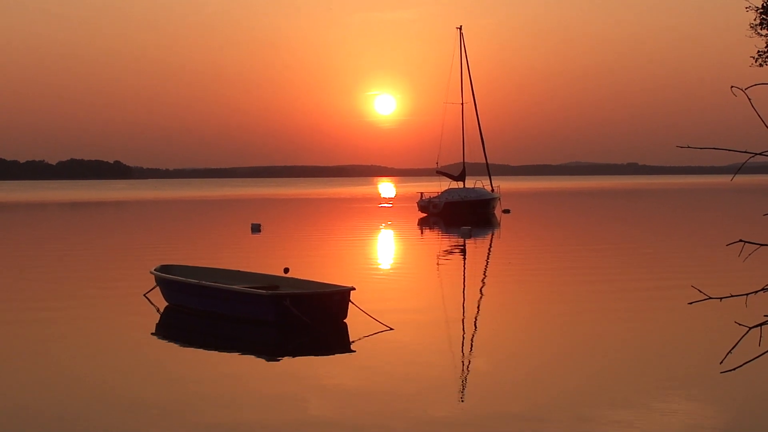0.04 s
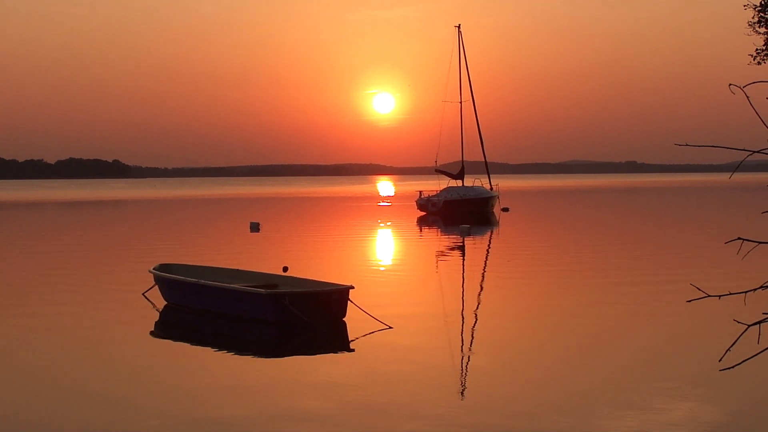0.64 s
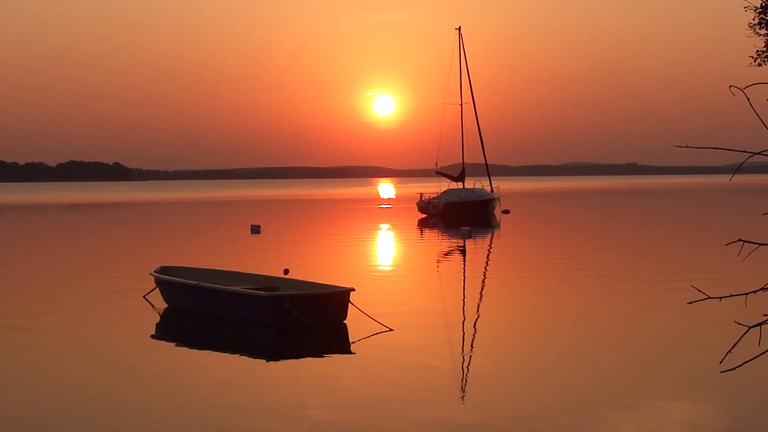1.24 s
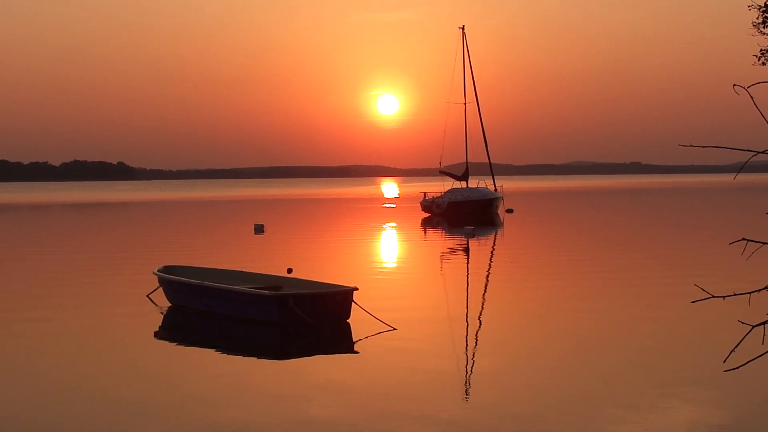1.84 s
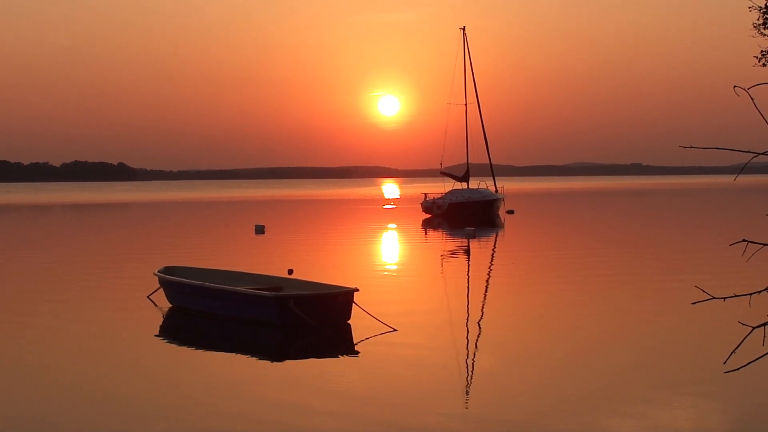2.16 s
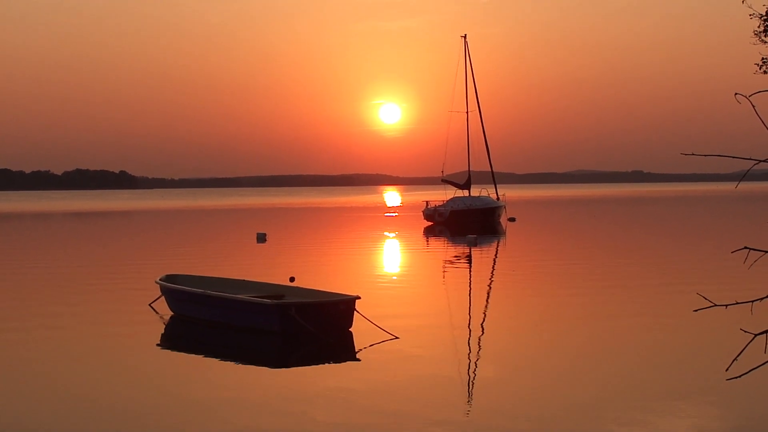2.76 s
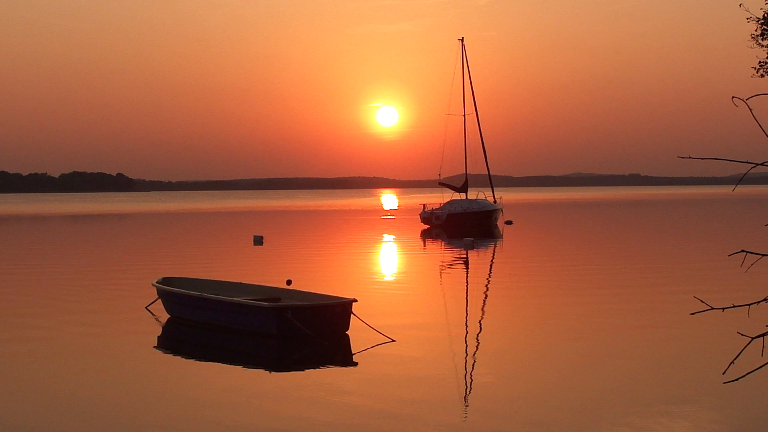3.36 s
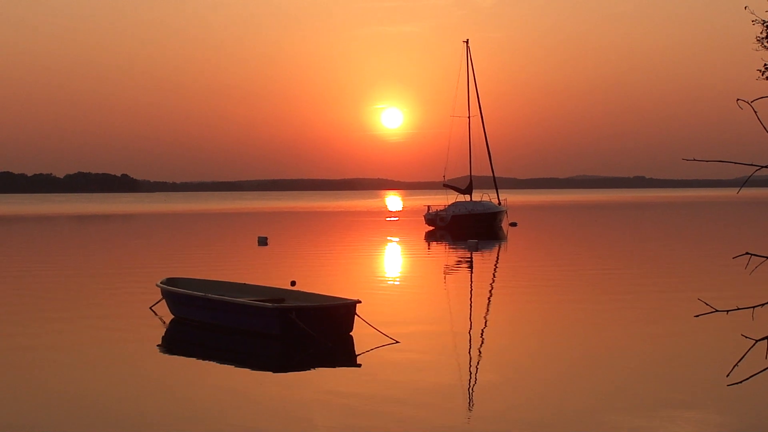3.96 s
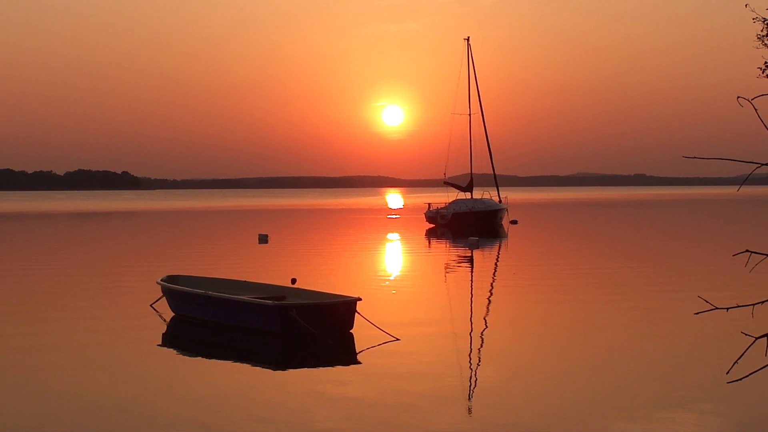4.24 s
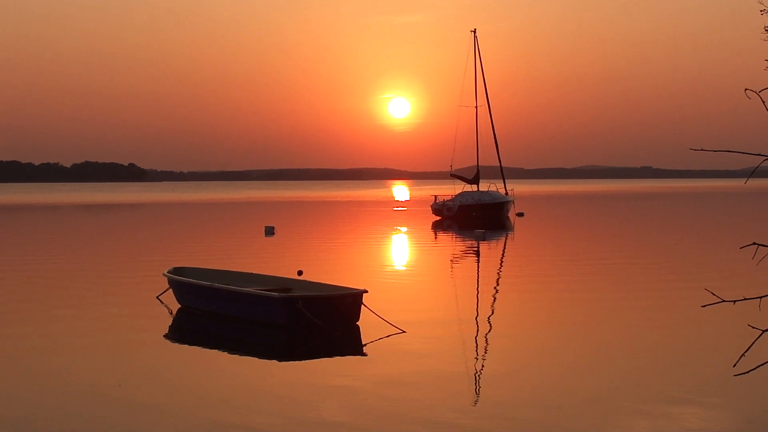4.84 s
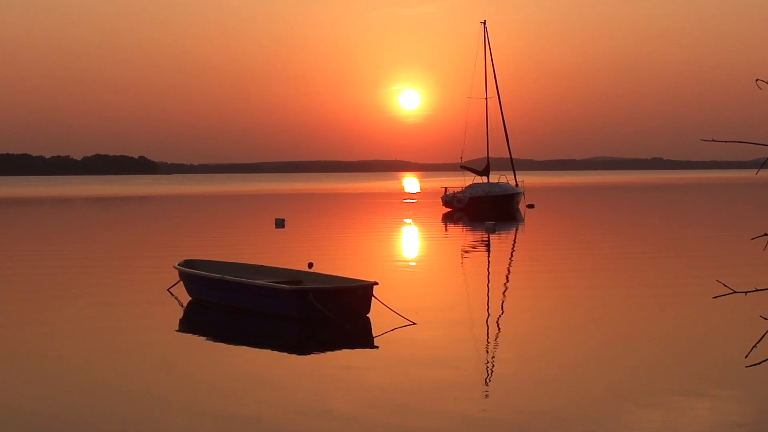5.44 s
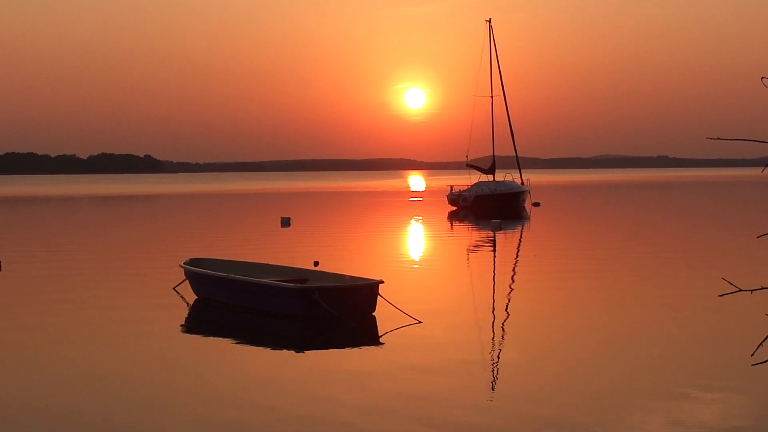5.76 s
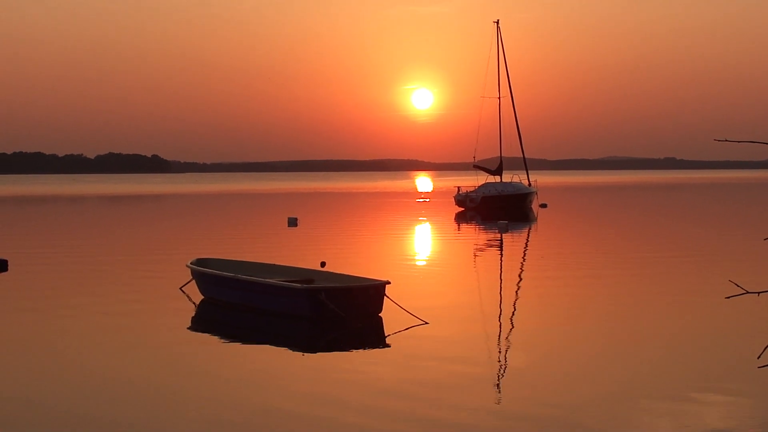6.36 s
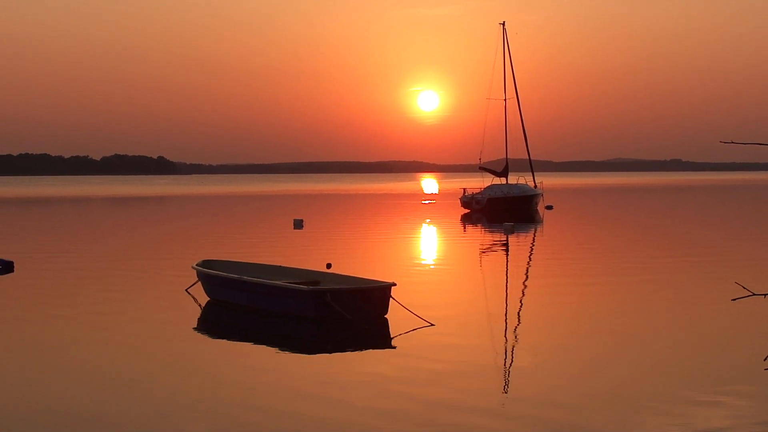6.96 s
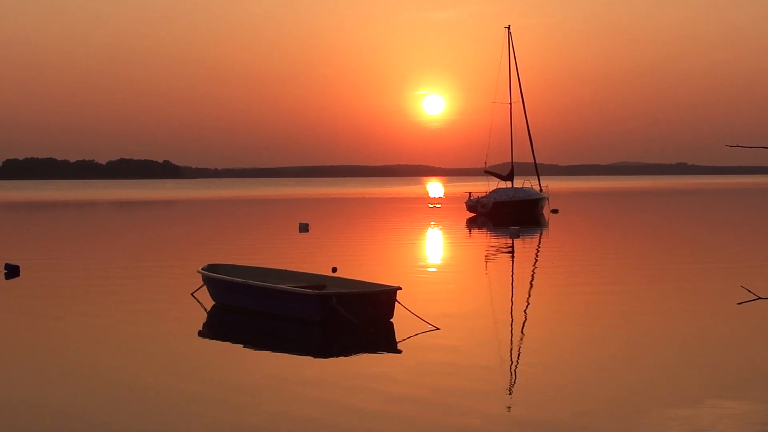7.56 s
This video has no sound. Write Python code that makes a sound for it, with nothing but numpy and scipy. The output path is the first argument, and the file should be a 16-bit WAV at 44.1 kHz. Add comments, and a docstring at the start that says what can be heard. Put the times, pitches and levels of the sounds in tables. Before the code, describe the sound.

At a calm lake, a wide, soft hush and a faint hiss run throughout. Small bubbles plop at the water's edge, then a crow gives three evenly spaced caws that sink and roughen, with a short echo from the trees. After a scatter of faint ticks and clicks, a lens motor ticks quietly near the microphone, a little to the left, and a barely audible hoarse swell comes from far away.

```python
"""A crow caws across a calm lake at sunset, and the wooded shore answers each caw.
Its syrinx pulses through throat and beak: a scoop up to a clean note that sinks, quavers and roughens.
Underneath lie a distant hush and a thin hiss, dotted with bubble plops, dull ticks and thin clicks.
Later the camera's lens motor ticks very softly, and a faint hoarse swell drifts across the water."""
import sys
import numpy as np
from scipy import signal
from scipy.fft import rfft, irfft, next_fast_len
from scipy.io import wavfile
from scipy.ndimage import uniform_filter1d, map_coordinates

SR = 44100
rng = np.random.default_rng(int(sys.argv[2]) if len(sys.argv) > 2 else 0)


def generate_wav(sig):
    """Save sig (samples, or channels by samples) to the path in sys.argv[1] as 16-bit PCM at SR."""
    pcm = np.round(np.clip(np.atleast_2d(sig).T, -1, 1) * 32767).astype(np.int16)
    wavfile.write(sys.argv[1], SR, pcm)


N = 339129

# Caws; only the first one's tail is heard: (start [s], length [s], note [Hz], effort [dB],
# quaver rate [Hz], time to a quaver crest [s], brightness [dB])
CAWS = [(-.402, .42, 420, -40.5, 39, 0.23, 2), (.564, 0.41, 421.8, -39.5, 36.5, .208, 0),
        (1.561, 0.41, 423.5, -39.5, 39.84, .239, 0.8), (2.593, 0.4, 418.6, -39, 35.62, 0.2, -1.5)]
# Where a caw's brightness acts: (frequency [Hz], share [0-1])
BRIGHT_SHELF = [(2400, 0), (3000, 1)]
# Throat with the beak wide open: (frequency [Hz], gain [dB])
THROAT_OPEN = [(400, -39), (830, -21), (1260, -3), (1680, -1), (2110, -3.5), (2520, -3.5), (3000, -22),
               (4800, -61), (5500, -28.5), (6200, -23.5), (6700, -18.5), (7200, -28), (8400, -37),
               (11000, -79)]
# Throat with the beak half closed: (frequency [Hz], gain [dB])
THROAT_NARROW = [(400, -33), (800, -21.5), (1080, -6), (1320, -20.5), (1480, -6.5), (1660, -5), (1890, 2.5),
                 (2060, 1.3), (2280, -6), (2550, -14), (3000, -18.5), (4800, -56), (6500, -25.5),
                 (8400, -39.5), (11000, -44)]
# Slapback off the nearest trees: (delay [s], gain [dB])
TREE_ECHOES = [(.048, -10.5), (.085, -17.5), (0.134, -19.5)]
# Reverb of the wooded shore: (frequency [Hz], t60 [s])
SHORE_DECAY = [(500, 0.97), (2000, 0.81), (7000, 0.21)]
# Colour of the distant hush: (frequency [Hz], gain [dB])
HUSH_COLOUR = [(25, -48), (50, -35.5), (110, -14.5), (150, -10), (240, -2), (400, 0.5), (700, 0),
               (1100, -2), (2000, -7), (3000, -14), (6000, -38)]
# Stereo image of the hush: (frequency [Hz], left-right correlation [-1 to 1])
HUSH_IMAGE = [(60, -0.062), (200, -0.51), (600, -0.51), (1200, -0.39), (2200, -0.28), (5000, -0.16)]
# Colour of the thin hiss: (frequency [Hz], gain [dB])
HISS_COLOUR = [(1000, -28), (3500, -5), (6500, 1), (8000, -1), (9500, -6), (10700, -8)]
# Bubbles: (time [s], level [dB], pitch [Hz], t60 [s], glide [octaves/s])
BUBBLES = [(.135, -52.5, 766, 0.17, -2), (.238, -46.5, 742, 0.11, 0), (.276, -52, 860, 0.14, 16)]
# Dull ticks: (time [s], relative level [dB])
TICKS = [(2.2538, -41), (3.309, -42.5), (3.42, -47), (3.441, -47), (3.468, -39), (3.613, -44), (3.831, -50),
         (3.938, -51), (4.0335, -46), (4.9148, -41)]
# Ring of a tick: (frequency [Hz], gain [dB], t60 [s])
TICK_MODES = [(1080, -16, .012), (1380, 1, 0.007), (1660, -3, 0.013), (2126, -0.5, 0.019)]
# Thin clicks: (time [s], level [dB], band centre [Hz], t60 [s])
CLICKS = [(2.33, -55, 8050, 0.0063), (3.468, -63, 8100, 0.023), (3.809, -57.5, 9300, 0.021),
          (5.196, -57, 4380, 0.026)]
# Runs of the lens motor: (start [s], end [s], base level [dB])
LENS_RUNS = [(5.19, 5.8, -58), (6.0, 7.3, -58), (7.47, 7.69, -57.5)]
# Ring of the lens barrel: (frequency [Hz], gain [dB], t60 [s])
BARREL_MODES = [(4480, -10, .013), (5370, -4, 0.012), (6660, -6.5, 0.0066), (8900, -11, 0.006)]
# Colour of the far swell, in the range of the caws: (frequency [Hz], gain [dB])
SWELL_COLOUR = [(1000, -30), (1550, 1), (2050, -3), (2800, -30)]
# The camera's scooped presence range: (frequency [Hz], gain [dB])
MIC_EQ = [(2200, 3.5), (2550, -3), (2850, -9), (3500, -7), (4600, -5.5), (5250, -3.5), (5700, 4),
          (6300, 3.5), (10600, 5.5), (11500, -5)]
# The camera's notches: (centre [Hz])
MIC_NOTCHES = [3020, 4020, 5020]

SCOOP_S, HOLD_S = .024, .098  # from a caw's start: the note is reached, the note starts to sink
FLAP_LEAD_S, FLAP_WIDTH_S, FLAP_DB = .007, .0038, -7  # one soft flap of the syrinx ahead of each caw


def amp(db):
    """Decibels to gain."""
    return 10 ** (np.asarray(db) / 20)


def unit(x):
    """Scale to rms 1."""
    return x / np.sqrt(np.mean(x ** 2) + 1e-20)


def along(points, hz):
    """Read a curve of (frequency, value) points on a log axis."""
    freqs, values = np.transpose(points)
    return np.interp(np.log(hz + 1), np.log(freqs + 1), values)


def wobble(rate, size):
    """A smooth random curve with rate knots a second."""
    knots = rng.standard_normal(int(size * rate / SR + 4))
    return map_coordinates(knots, [np.arange(size) * rate / SR])


def filtered(x, response):
    """EQ x with a gain that is a function of frequency."""
    n = x.shape[-1]
    padded = next_fast_len(n + 8192)
    return irfft(rfft(x, padded) * response(np.fft.rfftfreq(padded, 1 / SR)), padded)[..., :n]


def add(track, s, sound):
    """Mix a sound into the track from time s on."""
    i = max(round(s * SR), 0)
    part = track[i:i + len(sound)]
    part += sound[:len(part)]


def stereo_noise(colour, image):
    """Noise of rms 1 with a given colour and left-right correlation."""
    def mid_side_gains(f):
        angle = np.arccos(np.clip(along(image, f), -1, 1)) / 2
        return amp(along(colour, f)) * [np.cos(angle), np.sin(angle)]
    mid, side = filtered(rng.standard_normal((2, N)), mid_side_gains)
    return unit(np.array([mid + side, mid - side]))


def caw_gesture(t, length, note_hz, db, sag_hz_per_s=205, tire_db_per_s=9.5, attack_s=.0037,
                release_s=.064):
    """The crow scoops up, holds a clean note, then tires: pitch sinks, voice roughens, beak narrows."""
    scoop = 1 - np.clip(t / SCOOP_S, 0, 1)
    sinking_s = np.maximum(t - HOLD_S, 0)
    release = np.clip((t - length + release_s) / release_s, 0, 1)
    arch = .008 * (np.sin(np.pi * np.clip(t / (HOLD_S + SCOOP_S), 0, 1)) - 1)
    wander = .0042 * wobble(70, len(t))
    hz = note_hz * (1 - .2 * scoop + arch + wander) - sag_hz_per_s * sinking_s
    flap = amp(FLAP_DB) * np.exp(-((t + FLAP_LEAD_S) / FLAP_WIDTH_S) ** 2)
    onset = np.clip(t / attack_s, 0, 1) + flap
    effort = onset * amp(db - 2 * scoop - tire_db_per_s * sinking_s - 17.5 * release ** 2)
    quaver_depth = .08 * np.clip(sinking_s / .055, 0, 1) * np.exp(-sinking_s / .5)  # share of pitch
    hoarse = np.clip(.045 + .65 * np.sqrt(scoop) + 1.4 * sinking_s + .44 * release, 0, 1)
    closing = .35 + .38 * scoop + .65 * np.clip(sinking_s / .076, 0, 1)  # 0 open, 1 half closed
    return hz, effort, quaver_depth, hoarse, closing


def caw(length, note_hz, db, quaver_hz, crest_s, bright_db, jitter=.062, rattle=.28, rasp=.62):
    """Syrinx pulses through the throat; hoarseness adds pitch jitter, a rattle and a pulsing rasp."""
    n = SR // 2
    t = np.arange(n) / SR - 2 * FLAP_LEAD_S
    hz, effort, quaver_depth, hoarse, closing = caw_gesture(t, length, note_hz, db)
    # the quaver runs in arches: round crests and sharp dips
    arches = abs(np.cos(np.pi * quaver_hz * (t - crest_s) + .23 * wobble(25.08, n)))
    quaver = quaver_depth * 2 * (arches - 2 / np.pi)
    hz = hz * (1 + quaver + (.0031 + jitter * hoarse) * wobble(520, n))
    phase = 2 * np.pi * np.cumsum(hz) / SR
    # higher harmonics arrive later in the cycle, so each pulse is a short chirp
    harmonics = np.arange(1, 27)[:, None]
    pulses = unit(np.cos(harmonics * phase - .68 * harmonics ** 2).sum(0))
    # the membranes beat unevenly, which fills the gaps between the harmonics
    pulses = unit(pulses * (1 + rattle * np.sqrt(hoarse) * wobble(420, n)))
    breath = unit(rng.standard_normal(n) * (1 + .52 * np.cos(phase)))
    syrinx = pulses + rasp * np.sqrt(hoarse) * breath
    syrinx = filtered(syrinx, lambda f: amp(bright_db * along(BRIGHT_SHELF, f)))
    wide = filtered(syrinx, lambda f: amp(along(THROAT_OPEN, f)))
    narrow = filtered(syrinx, lambda f: amp(along(THROAT_NARROW, f)))
    voice = unit((1 - closing) * wide + closing * narrow)
    throb = amp(1.5 * quaver / quaver_depth.max())  # loudest on the crests
    return voice * effort * throb * (t < length)


def shore_reverb(x, build_s=.0057):
    """The trees scatter a diffuse mid and side tail; the treble dies first."""
    hz, t, noise = signal.stft(rng.standard_normal((2, SR)), SR, nperseg=256)
    decay = amp(-60 * t / along(SHORE_DECAY, hz)[:, None])
    tail = signal.istft(noise * decay * (1 - np.exp(-t / build_s)), SR, nperseg=256)[1]
    return signal.fftconvolve(x[None], tail / np.linalg.norm(tail[0]), axes=1)[:, :len(x)]


def crow(wet_db=-14, width=.41, pan_db=1.75, left_lag_s=.00003):
    """The caws, a little to the right, with slapback and reverb off the shore."""
    calls = np.zeros(N + SR)  # one second of pre-roll
    for start, *shape in CAWS:
        add(calls, 1 + start - 2 * FLAP_LEAD_S, caw(*shape))
    echoed = calls.copy()
    for delay, db in TREE_ECHOES:
        add(echoed, delay, amp(db) * calls)
    mid, side = amp(wet_db) * shore_reverb(calls)
    left = filtered(echoed + mid + width * side, lambda f: np.exp(-2j * np.pi * f * left_lag_s))
    right = echoed + mid - width * side
    lean_db = lambda f: pan_db * along([(1000, .14), (2000, 1), (3400, .93), (6000, -.22)], f)
    return filtered(np.array([left, right]), lambda f: amp([-lean_db(f), lean_db(f)]))[:, SR:]


def lake_hush(level_db=-54, drift_db=.5, pan_db=.5):
    """A wide, distant bed of noise whose level drifts gently."""
    drift = amp(level_db + drift_db * wobble(4.315, N))
    return drift * stereo_noise(HUSH_COLOUR, HUSH_IMAGE) * amp([[-pan_db], [pan_db]])


def thin_hiss(level_db=-67, flicker_db=1.6, pan_db=-.4):
    """A thin, high hiss with a faint, patchy flicker."""
    spectrum = signal.stft(stereo_noise(HISS_COLOUR, [(6000, -.079)]), nperseg=512)[2]
    patches = uniform_filter1d(rng.standard_normal(spectrum.shape[1:]), size=4, axis=0)
    patches = unit(uniform_filter1d(patches, size=10, axis=1))
    hiss = signal.istft(spectrum * amp(flicker_db * patches), nperseg=512)[1][:, :N]
    return amp(level_db) * unit(hiss) * amp([[-pan_db], [pan_db]])


def plops(attack_s=.002):
    """Bubbles at the water's edge ring briefly; one that nears the surface rises in pitch."""
    out, t = np.zeros(N), np.arange(SR // 10) / SR
    for s, db, hz, t60, glide in BUBBLES:
        phase = 2 * np.pi * np.cumsum(hz * 2 ** (glide * t)) / SR
        envelope = amp(db - 60 * t / t60) * (1 - np.exp(-t / attack_s))
        add(out, s, envelope * np.sin(phase))
    return out


def ticks(trim_db=-3.5, low_cut_hz=950):
    """Small dry knocks without bass, each ringing a few short, slightly detuned modes."""
    out, t = np.zeros(N), np.arange(SR // 10) / SR
    for s, db in TICKS:
        ring = np.zeros(len(t))
        for hz, mode_db, t60 in TICK_MODES:
            envelope = amp(mode_db + rng.normal(0, .52) - 60 * t / t60)
            ring += envelope * np.sin(2 * np.pi * hz * rng.normal(1, .036) * t)
        add(out, s, amp(db + trim_db) * ring)
    return signal.sosfilt(signal.butter(2, low_cut_hz, "highpass", fs=SR, output="sos"), out)


def clicks(width_octaves=.58):
    """Thin, bright snaps of band-passed noise."""
    out, t = np.zeros(N), np.arange(SR // 10) / SR
    for s, db, hz, t60 in CLICKS:
        band = lambda f: np.exp(-.5 * (np.log2((f + 1) / hz) / width_octaves) ** 2)
        burst = unit(filtered(rng.standard_normal(len(t)), band))
        add(out, s, amp(db - 60 * t / t60) * burst)
    return out


def lens_motor(start_s=5.1954, step_s=.02, kick_db=10, settle_s=.04, offbeat_db=-5.5, scatter_db=4):
    """Motor steps ring the lens barrel, strong and weak in turn, close to the left microphone."""
    out, t = np.zeros(N), np.arange(SR // 50) / SR
    times = np.arange(start_s, N / SR, step_s)
    steps = [(i, s, db) for start, end, db in LENS_RUNS for i, s in enumerate(times) if start <= s < end]
    for i, s, run_db in steps:
        db = run_db + kick_db * np.exp((start_s - s) / settle_s)  # the first steps hit harder
        ring = np.zeros(len(t))
        for hz, mode_db, t60 in BARREL_MODES:
            phase = 2 * np.pi * (hz * rng.normal(1, .01) * t + rng.random())
            ring += amp(mode_db - 60 * t / t60) * np.sin(phase)
        add(out, s, amp(db + offbeat_db * (i % 2) + scatter_db * rng.standard_normal()) * ring)
    return out * amp([[0], [-5]])


def far_swell(crest_s=7.57, half_width_s=.084, level_db=-63):
    """A soft swell of hoarse noise from far across the water."""
    envelope = np.exp(-((np.arange(N) / SR - crest_s) / half_width_s) ** 2)
    return amp(level_db) * envelope * stereo_noise(SWELL_COLOUR, [(1800, .4)])


def scene():
    """The crow up front, over the noise beds and the small details."""
    return crow() + lake_hush() + thin_hiss() + plops() + ticks() + clicks() + lens_motor() + far_swell()


def record(dry, notch_width_hz=125, top_hz=11509):
    """The camera scoops out the presence range, notches three bands and cuts the top."""
    def response(f):
        notches = [1 - 1.16 * np.exp(-((f - hz) / notch_width_hz) ** 2) for hz in MIC_NOTCHES]
        return amp(along(MIC_EQ, f)) * np.prod(notches, axis=0) * (f < top_hz)
    return filtered(dry, response)


dry = scene()
out = record(dry)
generate_wav(out)
```